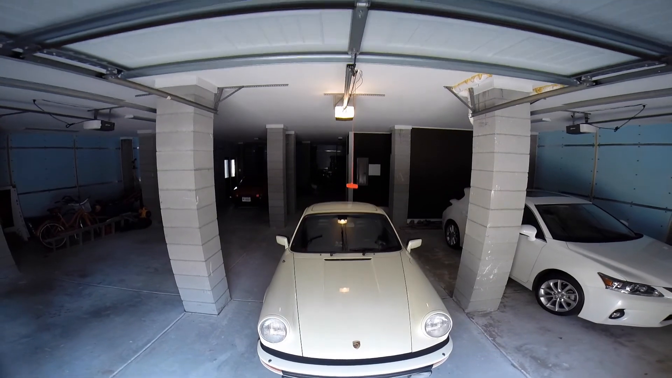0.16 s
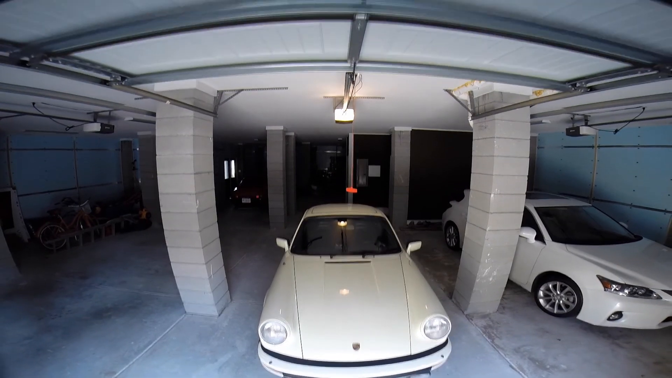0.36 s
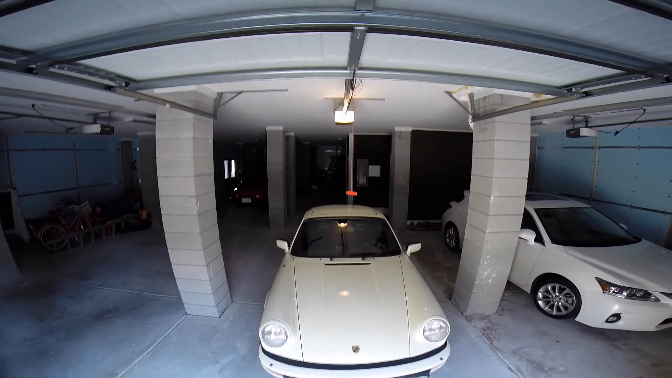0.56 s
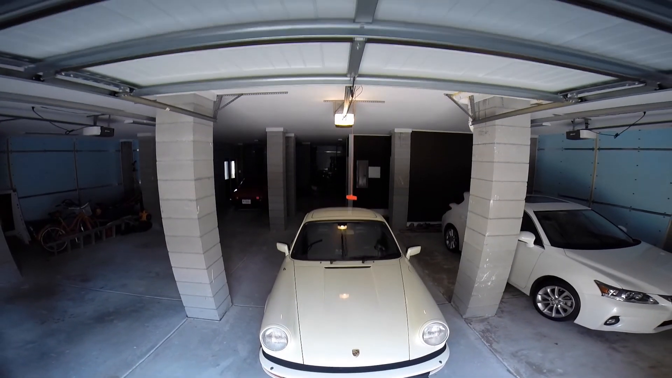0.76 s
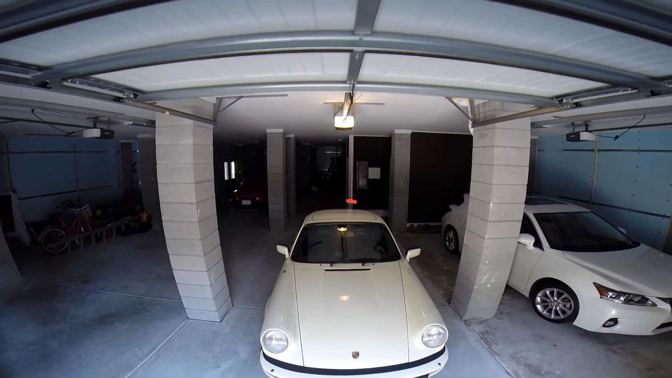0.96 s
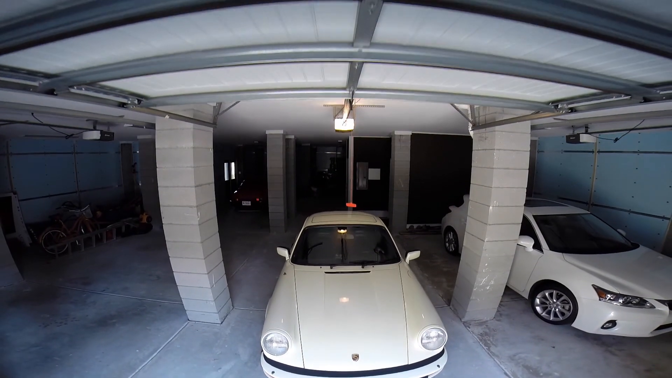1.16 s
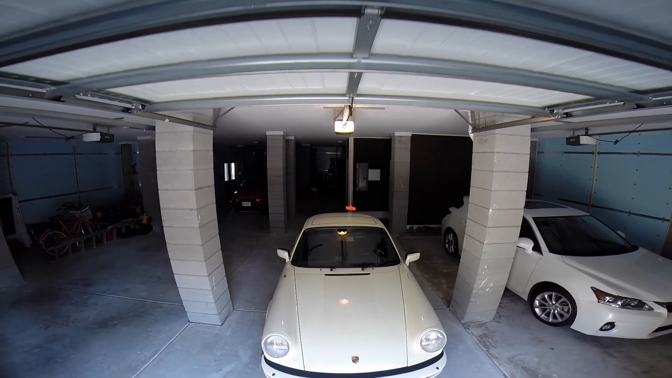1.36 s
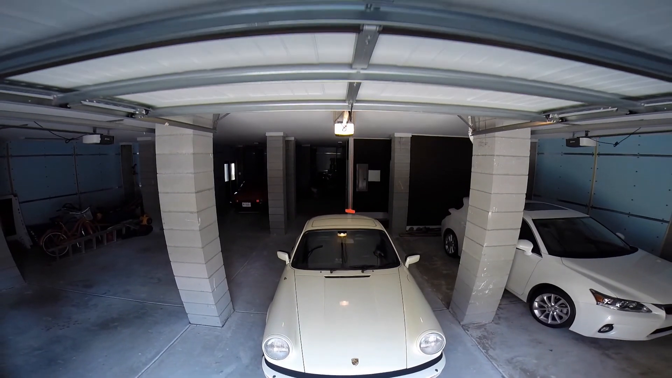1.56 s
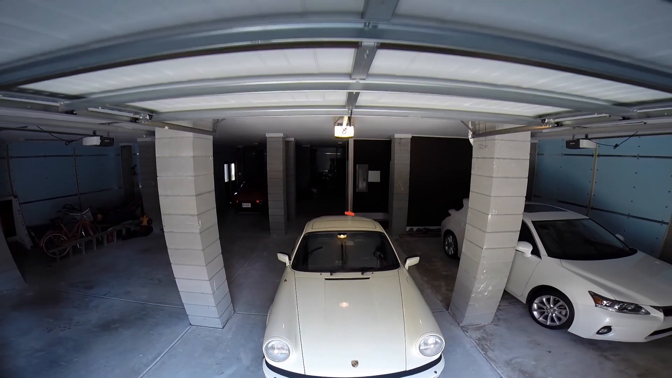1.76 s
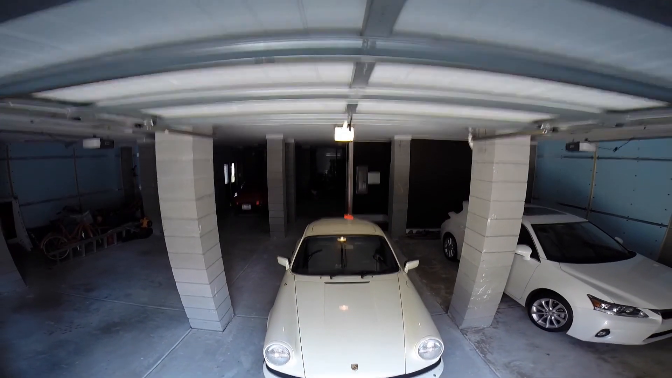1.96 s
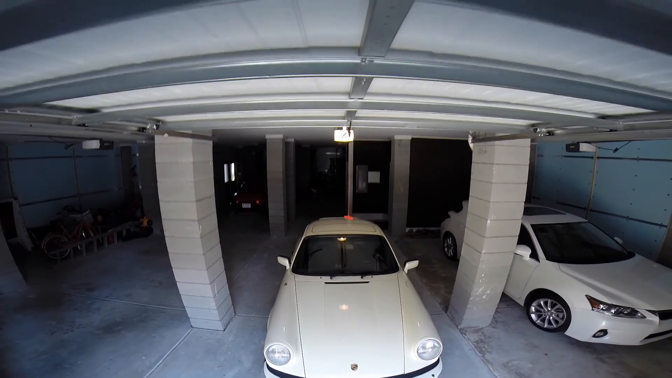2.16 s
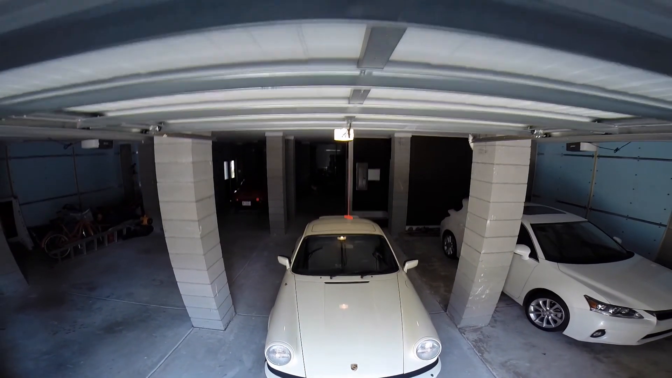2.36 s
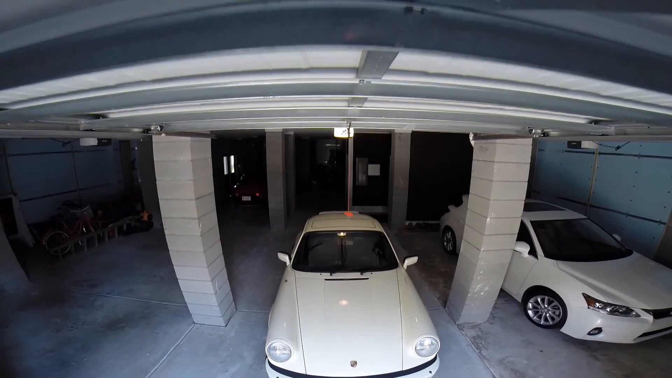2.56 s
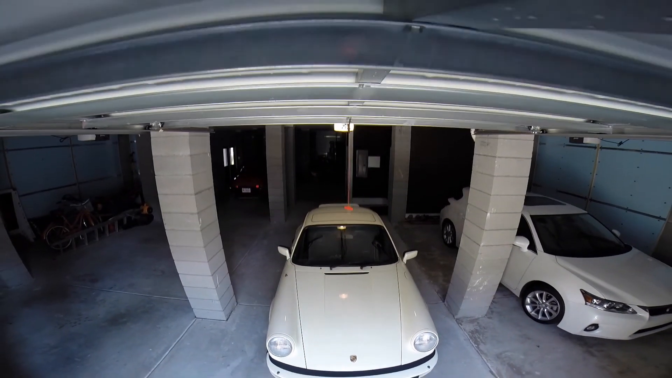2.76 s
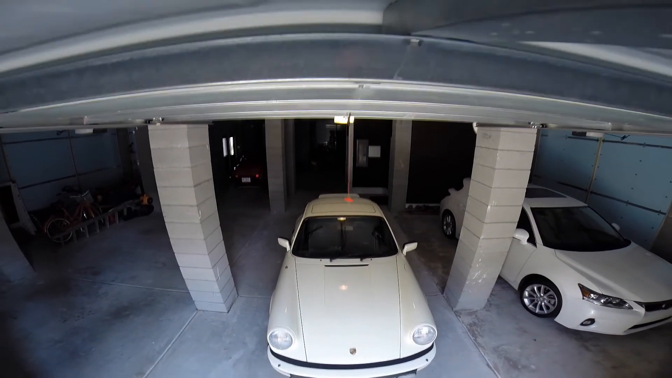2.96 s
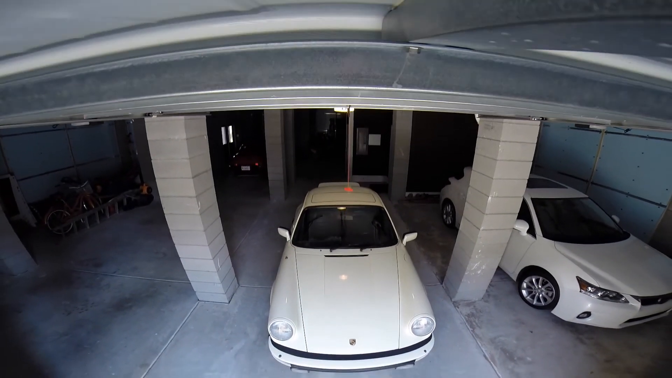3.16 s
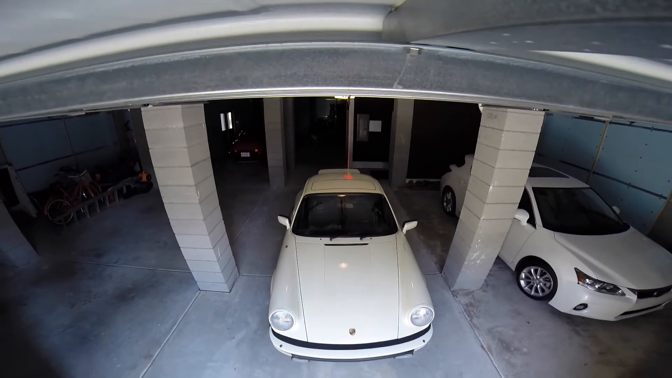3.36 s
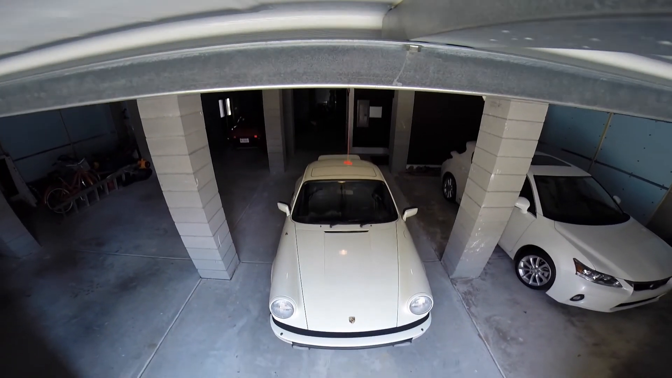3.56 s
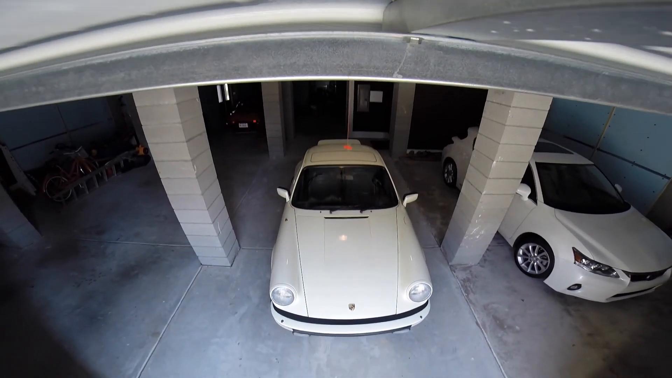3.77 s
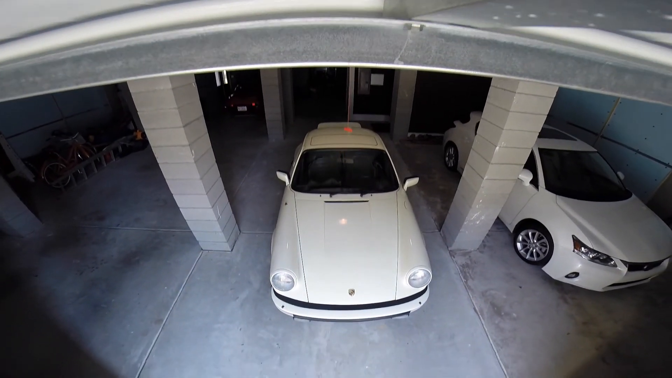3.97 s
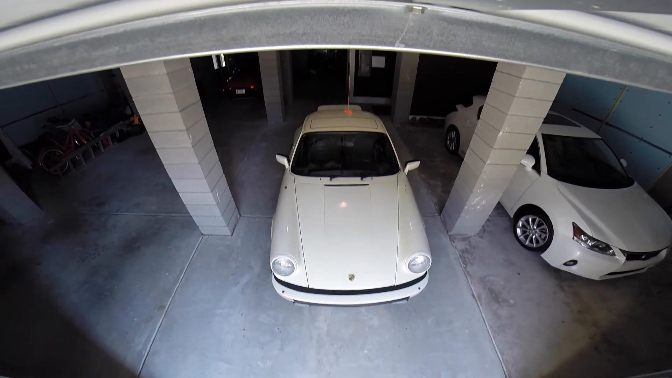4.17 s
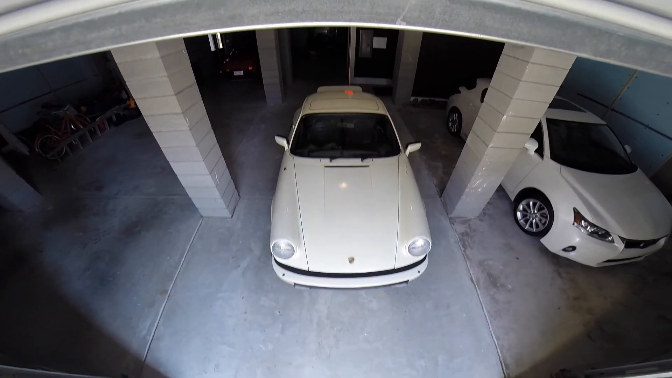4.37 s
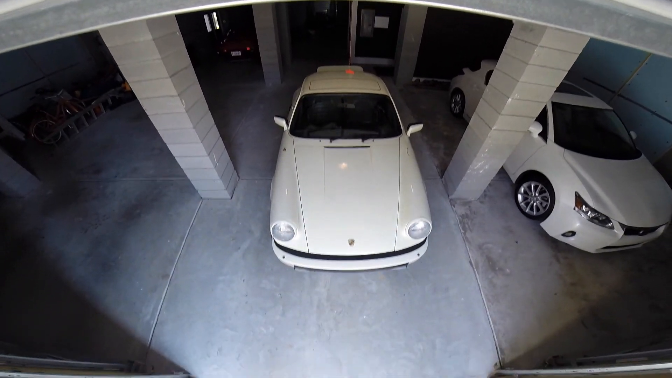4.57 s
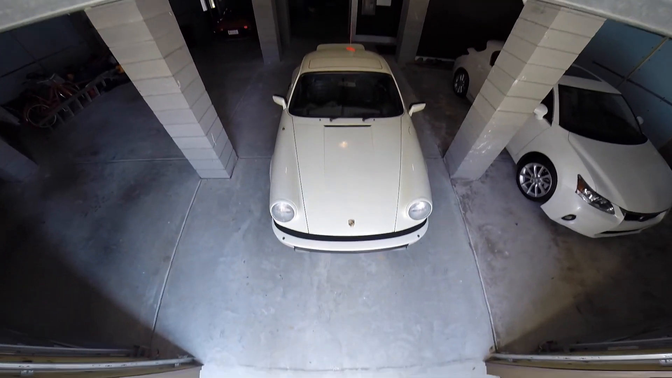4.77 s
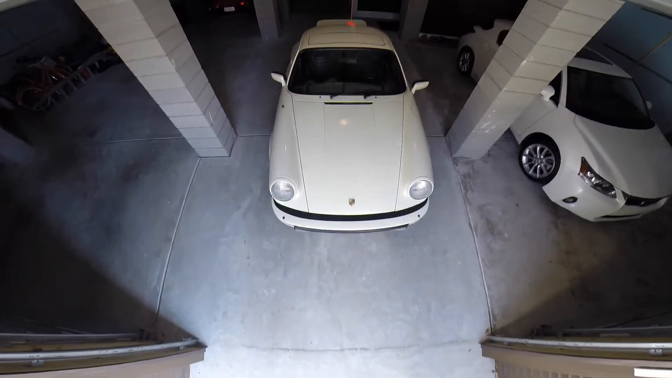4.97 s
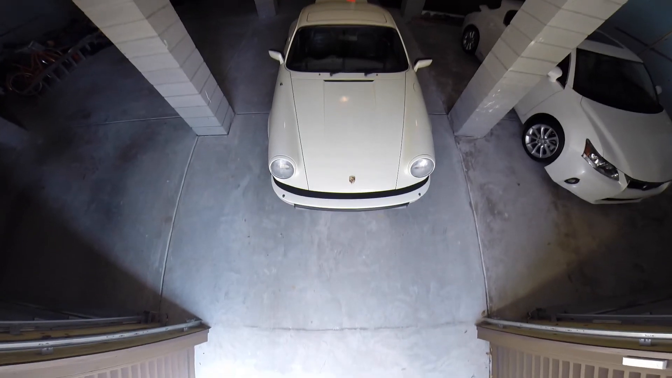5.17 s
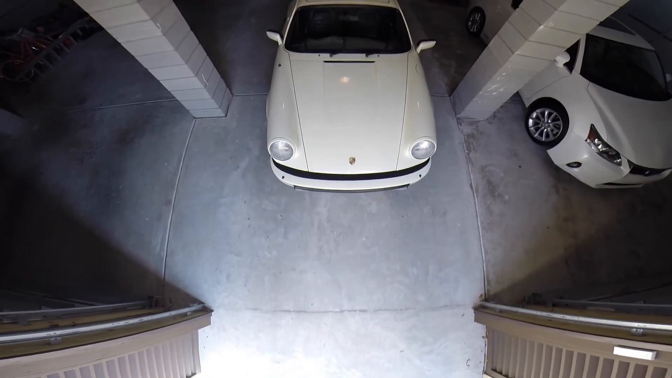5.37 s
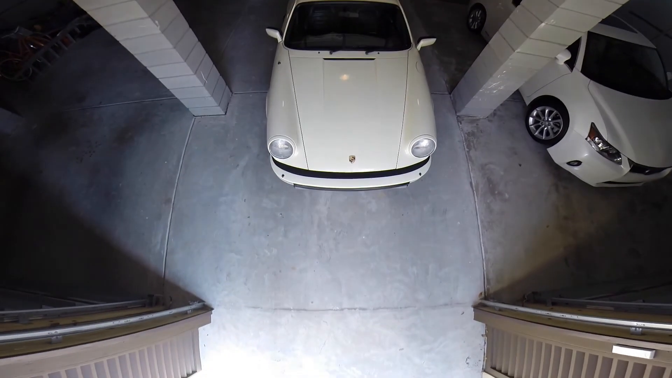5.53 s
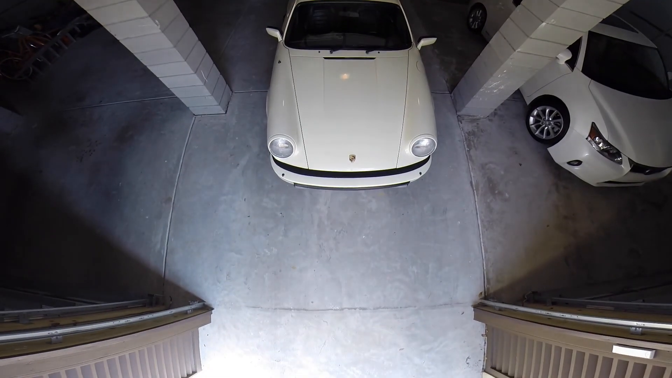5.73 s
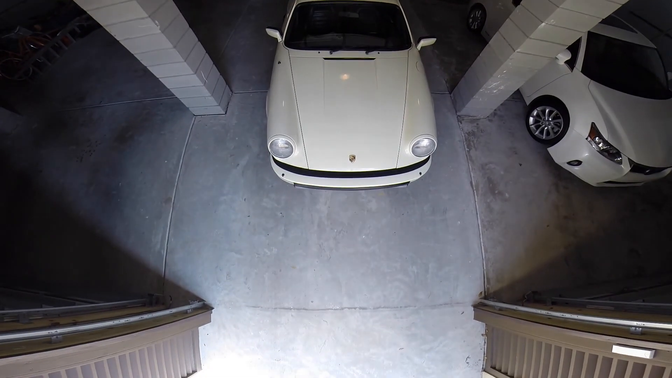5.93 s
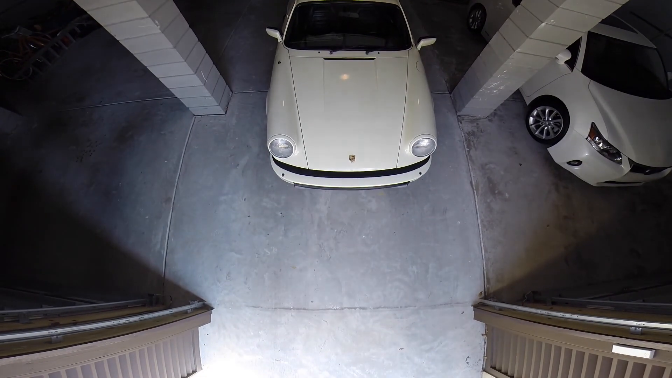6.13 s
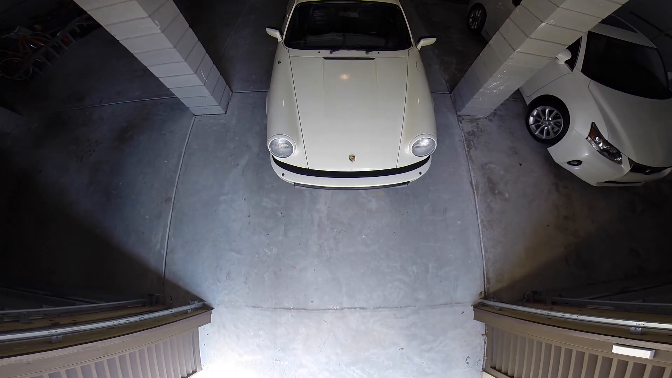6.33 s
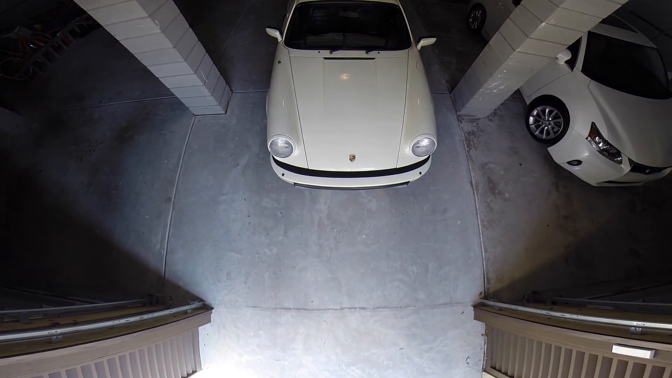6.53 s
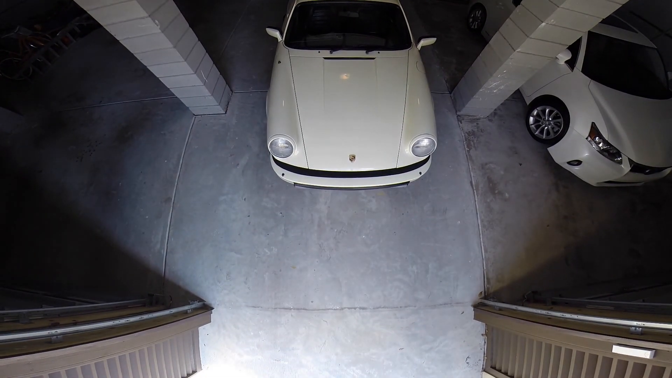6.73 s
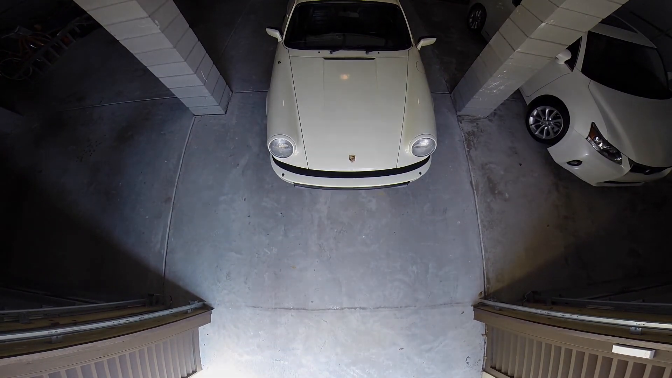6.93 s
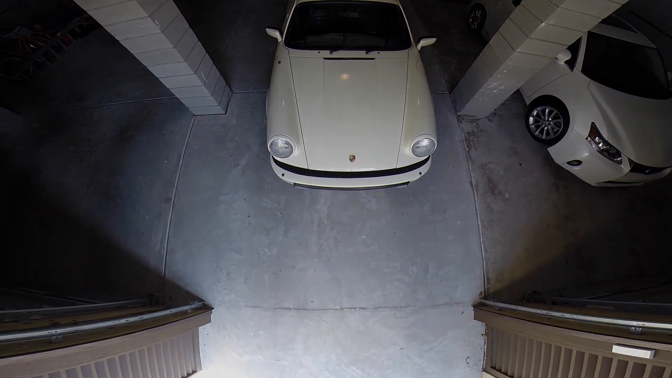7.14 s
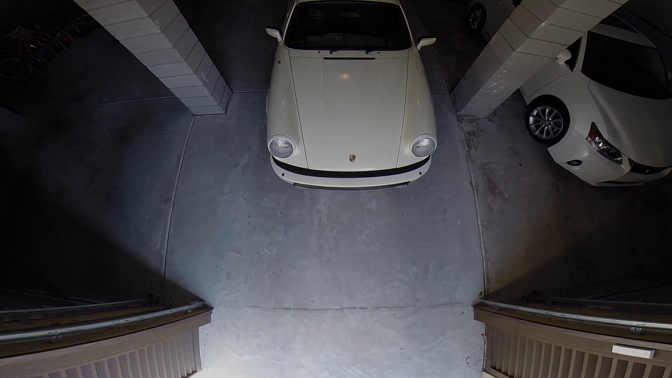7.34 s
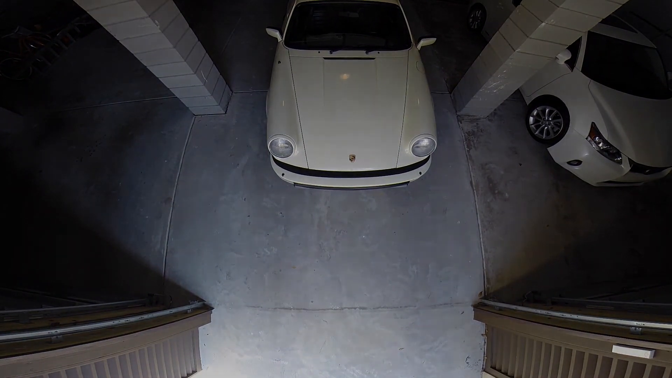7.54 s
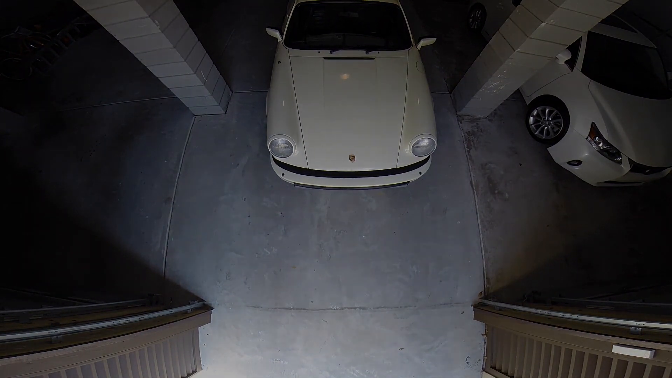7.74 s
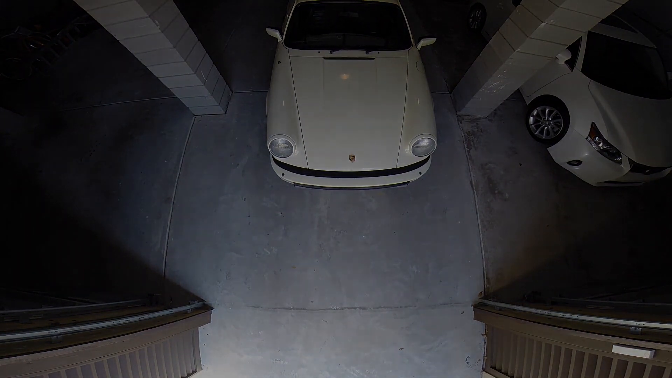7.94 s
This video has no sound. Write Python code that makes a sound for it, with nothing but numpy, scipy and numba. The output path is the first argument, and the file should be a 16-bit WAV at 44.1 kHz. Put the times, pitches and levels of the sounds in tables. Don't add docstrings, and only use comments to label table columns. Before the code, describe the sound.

A low mains hum and rough steel rolling fill a concrete garage, picked up close on the door itself. Opening slams give way to grinding, scraping drags, a dense cluster of roller knocks and dry spring ticks. After a loud hinge slam and last knocks, the door and motor stop at about five and a half seconds, leaving a fading low sway, distant traffic, hiss, faint insects and a thin high whine.

```python
import sys
import numpy as np
from scipy import signal
from scipy.fft import rfft, irfft
from scipy.io import wavfile
from scipy.ndimage import uniform_filter1d
from numba import njit

SR = 44100
rng = np.random.default_rng(int(sys.argv[2]) if len(sys.argv) > 2 else 0)


def rack_gain(trim_db):
    fader = np.asarray(trim_db, float)
    return 10 ** (fader / 20)


def dump(signal):
    limited = np.clip(np.atleast_2d(signal).T, -1, 1)
    pcm = np.round(limited * 32767).astype(np.int16)
    wavfile.write(sys.argv[1], SR, pcm)


N = 352796
TIME_S = np.arange(N) / SR
HUM_HZ = 120.0


def at_level(x, rms_db):
    return x * rack_gain(rms_db) / np.sqrt(np.mean(x ** 2))


def colour(x, points, lo_hz, hi_hz):
    f = np.maximum(np.fft.rfftfreq(N, 1 / SR), 1)
    hz, db = np.transpose(points)
    edge = 1 / np.sqrt((1 + (lo_hz / f) ** 12) * (1 + (f / hi_hz) ** 12))
    gain = rack_gain(np.interp(np.log(f), np.log(hz), db)) * edge
    return irfft(rfft(x) * gain, N) / np.sqrt(np.mean(gain ** 2))


@njit
def svf(x, hz, width_hz):
    y, band, low = np.empty(len(x)), 0., 0.
    g, damping = np.tan(np.pi * hz / SR), width_hz / hz
    for i in range(len(x)):
        v = (band + g * (x[i] - low)) / (1 + g * (g + damping))
        band = 2 * v - band
        low += 2 * g * v
        y[i] = damping * v
    return y


def mode(x, hz, width_hz):
    return svf(x, float(hz), float(width_hz))


def noise():
    return rng.standard_normal(N)


def walk(rate_hz):
    hold = int(SR / rate_hz)
    steps = np.repeat(rng.standard_normal(N // hold + 1), hold)
    return 1.45 * uniform_filter1d(uniform_filter1d(steps, hold), hold)[:N]


def curves(table):
    s, *columns = np.transpose(table)
    return [np.interp(TIME_S, s, c) for c in columns]


def stretch(start_s, end_s, edge_s):
    return np.clip(np.minimum(TIME_S - start_s, end_s - TIME_S) / edge_s, 0, 1)


def decay(t, t60_s):
    return np.exp(-np.log(1000) * t / t60_s)


def contacts(per_s, spread_db):
    size_db = spread_db * np.minimum(rng.exponential(size=N), 3)
    knocks = (rng.random(N) < per_s / SR) * rack_gain(size_db)
    return at_level(noise() * (1 + knocks), 0)


# start_s, hum_db, octave_db
HUM_PATH = [(0.0, -42, -42), (0.45, -51, -43), (0.62, -40, -42), (0.85, -43, -41), (1.15, -52, -40.5),
            (1.5, -43, -39.5), (1.75, -40, -39), (2.22, -36, -40.5), (2.66, -32, -41.5), (3.1, -38, -41),
            (3.58, -34, -41.5), (3.84, -44, -46), (4.05, -41, -47), (4.4, -32, -48), (4.88, -37, -48),
            (5.0, -35, -42), (5.2, -42, -44), (5.45, -43, -42)]


def motor():
    hum_db, octave_db = [c + 1.1 * walk(15) for c in curves(HUM_PATH)]
    phase = 2 * np.pi * HUM_HZ * TIME_S
    tone = rack_gain(hum_db + 0.5) * np.sin(phase)
    tone = tone + rack_gain(octave_db + 1.5) * np.sin(2 * phase)
    tone = tone + rack_gain(-62) * np.sin(4 * phase)
    off_s, run_down_s = 5.58, 0.15
    return np.sqrt(2) * tone * np.clip((off_s - TIME_S) / run_down_s, 0, 1)


# start_s, strain_db
ROLLER_STRAIN = [(0.0, 7), (0.29, -0.5), (0.6, 0.5), (1.2, -1), (1.45, 3.5), (1.62, 1.5), (1.74, -4),
                 (2.0, 0.5), (2.3, 2), (2.52, 4), (2.72, 0), (2.96, 3.5), (3.27, 2), (3.65, 0),
                 (4.43, -2.5), (4.75, -1), (5.05, 7), (5.44, 3)]
# level_db, share_db_per_db of strain, drift_db_per_s, fall_db_per_s after the stop, rest_db
ROLLING_LAYERS = [
    (-44.5, 0.61, 1, 7.5, -64),
    (-43.5, 0.54, -0.13, 22, -72),
    (-43, 0.96, 0.2246, 41.5, -71.5),
    (-53.5, 0.5, -0.055, 65, -75),
]


def rolling_levels():
    strain, door_stops_s = curves(ROLLER_STRAIN)[0], 5.498
    after = np.maximum(TIME_S - door_stops_s, 0)
    levels = []
    for db, share, drift, fall, rest_db in ROLLING_LAYERS:
        moving_db = db + share * strain + drift * (TIME_S - after) - fall * after
        levels.append(10 * np.log10(rack_gain(2 * moving_db) + rack_gain(2 * rest_db)))
    return levels


# pitch_hz, level_db per Hz
SWAY_SPECTRUM = [(20, -1), (40, 3.5), (65, 3), (100, 1), (160, -5), (230, -9.5), (320, -12.5), (450, -21)]


def sway_and_boom(sway_db, boom_db):
    sway = rack_gain(sway_db + 0.82 * walk(8.4)) * colour(noise(), SWAY_SPECTRUM, 22, 163)
    boom = rack_gain(boom_db + 3.5 + 0.31 * walk(8.6)) * colour(noise(), SWAY_SPECTRUM, 105, 433)
    return sway + boom


# pitch_hz, level_db per Hz
DOOR_SPECTRUM = [(150, -29.5), (260, 12.5), (273, 10), (334, -0.5), (515, -12.5), (640, -9.5), (971, -11),
                 (1420, -26), (1990, -26), (3390, -32.5), (4580, -44.5), (5150, -35.5), (9700, -57.5),
                 (12000, -58.5), (14000, -67)]


def through_case(x, lo_hz, hi_hz):
    return colour(x, DOOR_SPECTRUM, lo_hz, hi_hz)


def grind(level_db):
    return rack_gain(level_db + 0.82 * walk(12)) * at_level(through_case(contacts(300, 4.6), 414, 1140), -2.32)


# start_s, end_s, lift_db
TRACK_SCRAPES = [
    (1.28, 1.635, 4),
    (2.722, 3.164, 3),
    (3.387, 3.53, 3.5),
    (4.94, 5.553, 1),
]


def rattle(level_db):
    drag_db = sum(lift_db * stretch(a, b, 0.034) for a, b, lift_db in TRACK_SCRAPES)
    chatter = at_level(through_case(contacts(800, 3.3), 1263, 15000), -3.0)
    return rack_gain(level_db + drag_db + 1.1 * walk(30)) * chatter


# pitch_hz, width_hz, level_db over the broad sound
PANEL_MODES = [(674, 120, -19), (739.4, 23, 2.5), (889, 8.2, -13), (993, 5.3, -7), (1203, 65, -3),
               (2000, 26, -21), (2220, 60, -7), (2360, 47, -7.5), (2766, 32, -10), (3420, 150, -16.5),
               (4500, 47, -2.5), (5120, 130, -5.5), (4720, 34, -10.5), (6600, 92, -9.5), (6470, 84, -7.5)]


def panel(x, gains_db):
    out = 0
    for k, ((hz, width, db), gain_db) in enumerate(zip(PANEL_MODES, gains_db)):
        out = out + (-1) ** k * 2 * rack_gain(db + gain_db) * mode(x, hz, width)
    return out


# pitch_hz, level_db per Hz
TOWN_SPECTRUM = [(120, 4.5), (240, -11), (580, -14.5), (900, -10.5), (1500, -27), (3000, -30), (5000, -31),
                 (8000, -38), (12000, -41.5), (15000, -46.5)]


def town():
    return at_level(rack_gain(0.6 * walk(1.64)) * colour(noise(), TOWN_SPECTRUM, 155, 15000), -66)


# pitch_hz, width_hz, chirps_per_s, level_db
INSECT_SONGS = [(5600, 200, 31, -91), (11050, 350, 31, -93)]
# start_s, end_s, level_db
CHIRR_TIMES = [
    (7.15, 7.45, -88),
    (7.88, 7.96, -91),
]


def insects():
    out = np.zeros(N)
    for hz, width, rate, db in INSECT_SONGS:
        pulses = np.maximum(np.sin(2 * np.pi * rate * TIME_S), 0) ** 2 * rack_gain(1.5 * walk(6))
        out += at_level(pulses * mode(mode(noise(), hz, width), hz, width), db)
    chirr = at_level(mode(mode(noise(), 9800, 900), 9800, 900), 0)
    return out + chirr * sum(rack_gain(db) * stretch(a, b, 0.017) for a, b, db in CHIRR_TIMES)


# pitch_hz, level_db
WHINE_LINES = [(5846, -81), (5873, -91), (11687, -105), (11719, -86.5), (11746, -101), (14626, -93.5)]


def camera_whine():
    out = np.zeros(N)
    for hz, db in WHINE_LINES:
        out += np.sqrt(2) * rack_gain(db + 0.4 * walk(60)) * np.sin(2 * np.pi * hz * TIME_S)
    return out


TOP_UNDER_BRIGHT_DB, KNOCK_HZ = -15.5, 2060

# start_s, ring_db, body_db, bright_db, pitch_hz
HINGE_SLAMS = [(0.0244, -24, -18.5, -46, 2290), (0.0399, -19, -21, -28.5, 2220),
               (0.1858, -20, -19, -40.5, 2870), (0.3122, -19, -15, -28, 2440),
               (0.394, -26.5, -22.5, -70, 2920), (.7542, -36.5, -49, -58, 2540),
               (.83, -37, -57, -51.5, 2550), (1.256, -25, -31, -41, 2970), (2.445, -32, -30, -55, 2100),
               (2.504, -33.5, -22.5, -58, 2110), (3.864, -29.5, -20, -67, 2700),
               (4.8846, -26, -55, -55, 2680), (4.8922, -22.5, -11.5, -37.5, 2000),
               (5.493, -31, -21, -81, 2720), (5.5194, -50, -27, -81, 2850)]


def hinge_slams():
    return [(s, body, ring, bright, bright + TOP_UNDER_BRIGHT_DB, -7, hz)
            for s, ring, body, bright, hz in HINGE_SLAMS]


# start_s, strength_db, hardness_db
ROLLER_KNOCKS = [(.2454, -32, -16), (.4244, -35, 3), (.4828, -28.5, 0), (1.3894, -43, 20),
                 (1.4594, -53, 26), (1.494, -42.5, 20.5), (1.5494, -47, 20), (1.5894, -51.5, 27),
                 (2.027, -27, -14), (2.2294, -50, 17), (2.6696, -24.5, -10), (2.7616, -26, 1.5),
                 (2.7894, -25.5, -6), (2.8423, -23, 3.5), (2.935, -23.5, 3.5), (2.9724, -34, 0),
                 (3.0233, -24, 0), (3.113, -27.5, 10), (3.4116, -33, 0), (3.8333, -33, -1),
                 (3.933, -22.5, -3.5), (3.9594, -34, -5), (5.199, -31, 1), (4.7594, -48, 9),
                 (5.124, -25.5, -15), (5.2789, -27, -3), (5.367, -32, 4), (5.4101, -25.5, -7),
                 (5.4344, -35, -7), (5.5894, -43.5, 3)]


def roller_knocks():
    blows = []
    for s, db, hard in ROLLER_KNOCKS:
        ring, bright = db - 12 + hard / 2, db - 28.5 + hard
        blows.append((s, db, ring, bright, bright + TOP_UNDER_BRIGHT_DB, 0, KNOCK_HZ))
    return blows


# start_s, level_db
SHEET_SNAPS = [(2.4354, -44.5), (2.4442, -50), (2.503, -51), (3.4594, -53.5), (4.3136, -58), (4.3894, -63)]


def snaps_and_creak():
    blows = [(s, db - 3.5, db - 3.5, db - 3, db, 0, KNOCK_HZ) for s, db in SHEET_SNAPS]
    return blows + [(7.6004, -48, -99, -99, -99, 0, KNOCK_HZ)]


# pitch_hz, width_hz, level_db
TRACK_MODES = [(860, 60, 3), (2000, 55, 9), (2860, 70, 7), (4330, 60, 7)]


def track(x, gains_db):
    return sum(rack_gain(db + gain_db) * mode(x, hz, width) for (hz, width, db), gain_db in zip(TRACK_MODES, gains_db))


# rise_s, t60_s, trim_db
CLANK_SHAPES = [
    (0.013, 0.16, -9),
    (0.0081, 0.14, -7.5),
    (0.0022, 0.1, -1.5),
    (0.0029, 0.14, -8.5),
]
CLANK_BORDERS = 500, 1400, 4000, 8000, 15000


def clanks():
    out, t = np.zeros(N), np.arange(SR // 2) / SR
    grit = contacts(1500, 3)
    bands = []
    for lo_hz, hi_hz, (_, _, trim_db) in zip(CLANK_BORDERS, CLANK_BORDERS[1:], CLANK_SHAPES):
        bands.append(at_level(through_case(grit, lo_hz, hi_hz), trim_db))
    for s, *band_dbs, track_db, hz in hinge_slams() + roller_knocks() + snaps_and_creak():
        spot = rng.standard_normal(len(PANEL_MODES))
        i = int((s - 0.0036) * SR)
        tt = t[:N - i]
        here = slice(i, i + len(tt))
        burst = np.full(len(tt), 1e-18)
        for band, db, (rise_s, t60_s, _) in zip(bands, band_dbs, CLANK_SHAPES):
            burst += rack_gain(db) * band[here] * (1 - np.exp(-tt / rise_s)) * decay(tt, t60_s)
        ring = rack_gain(10) * mode(burst * np.exp(-tt / 0.012), hz, 450)
        rail = rack_gain(track_db) * track(burst, 3 * np.clip(spot[::-1], -2, 0.5))
        out[here] += burst + ring + rail + panel(burst, 2 * np.clip(spot, -2, 1))
    return out


# pitch_hz, level_db, t60_s
BRACKET_MODES = [(4960, -5, .22), (5170, -3, .22), (5880, -5, .15), (6100, -3, .19), (6300, -2, .24),
                 (6590, -3, .18), (6770, -5, .15), (6950, -6, .14)]


def bracket():
    t = np.maximum(TIME_S - 0.309, 0)
    buzz, ring = noise(), np.zeros(N)
    for hz, db, t60_s in BRACKET_MODES:
        ring += at_level(mode(mode(buzz, hz, 150), hz, 300), db) * decay(t, t60_s)
    return rack_gain(-31) * ring * (1 - np.exp(-t / 0.0025))


# start_s, level_db
SPRING_SLIPS = [(0.6548, -44.5), (2.0687, -41), (2.0802, -42), (2.1283, -38.5), (2.162, -43), (3.018, -36),
                (3.0825, -42), (3.1453, -44), (3.2161, -43), (3.2855, -38), (3.351, -32.5), (3.4122, -34.5),
                (3.4715, -34), (3.539, -31.5)]
# pitch_hz, width_hz, level_db
SPRING_MODES = [(3510, 300, 3.5), (5140, 960, -1), (6070, 710, -6), (10400, 3800, -33)]


def spring_ticks():
    slip = np.zeros(N)
    for s, db in SPRING_SLIPS:
        slip[int(s * SR)] = rack_gain(db + 23.0)
    return sum(rack_gain(db) * mode(mode(slip, hz, width), hz, 2 * width) for hz, width, db in SPRING_MODES)


@njit
def walls(x, lags, gain, damp):
    line, soft, out = np.zeros((8, 4096)), np.zeros(8), np.zeros(len(x))
    for i in range(len(x)):
        total = 0.
        for k in range(8):
            soft[k] += (1 - damp) * (gain[k] * line[k, (i - lags[k]) & 4095] - soft[k])
            total += soft[k]
        out[i] = soft[0] - soft[3] + soft[5] - soft[6]
        for k in range(8):
            line[k, i & 4095] = x[i] + soft[k] - total / 4
    return out


def garage(x):
    lags = rng.integers(600, 2600, size=8)
    return rack_gain(-9.5) * walls(x + 1e-18, lags, rack_gain(-60 * lags / SR / 0.59), 0.55)


def scene():
    sway_db, boom_db, grind_db, rattle_db = rolling_levels()
    rolling = grind(grind_db) + rattle(rattle_db)
    rolling = rolling + panel(rolling, np.full(len(PANEL_MODES), -5))
    steel = rolling + clanks() + bracket()
    leaf = steel + garage(steel) + sway_and_boom(sway_db, boom_db)
    for hz in (HUM_HZ, 2 * HUM_HZ):
        leaf = leaf - 0.6 * mode(leaf, hz, 14)
    background = town() + insects() + camera_whine()
    return (leaf + motor() + spring_ticks() + background)[None]


def top_cut(x):
    return signal.sosfilt(signal.butter(12, 15100, fs=SR, output="sos"), x)


def record(dry):
    return top_cut(dry)


dry = scene()
out = record(dry)
dump(out)
```